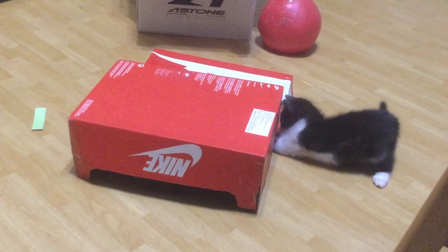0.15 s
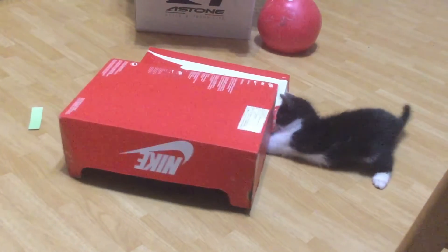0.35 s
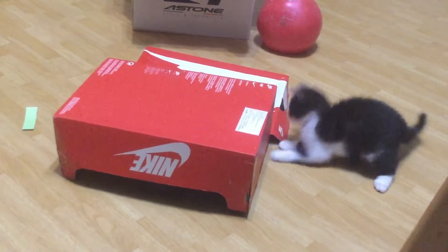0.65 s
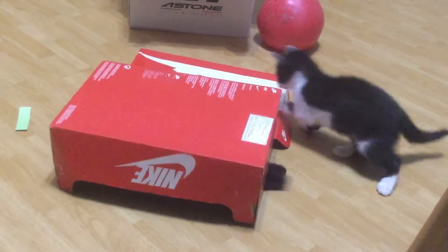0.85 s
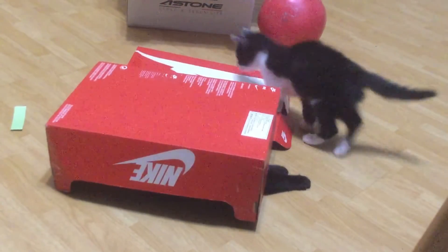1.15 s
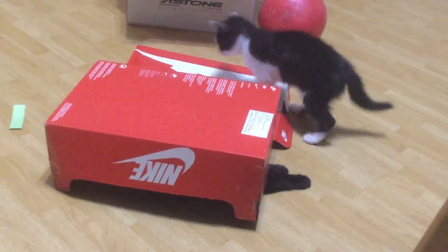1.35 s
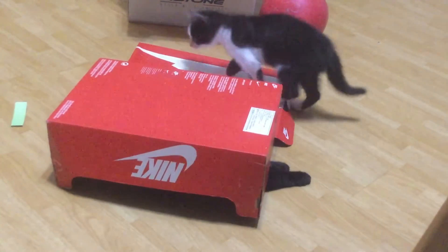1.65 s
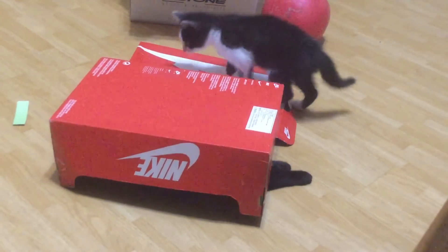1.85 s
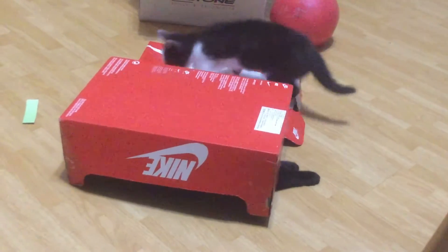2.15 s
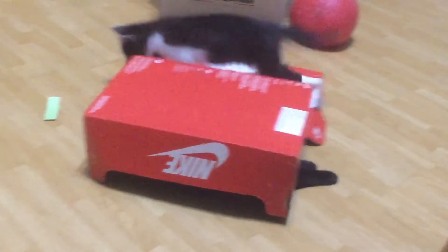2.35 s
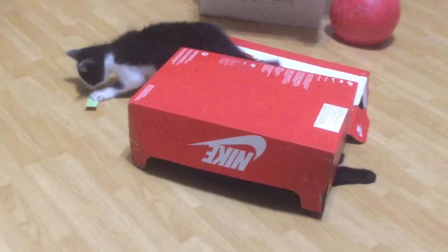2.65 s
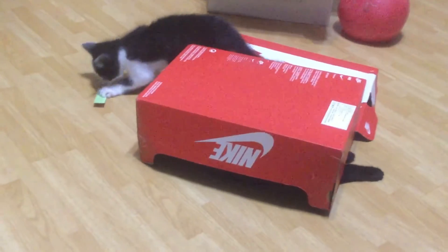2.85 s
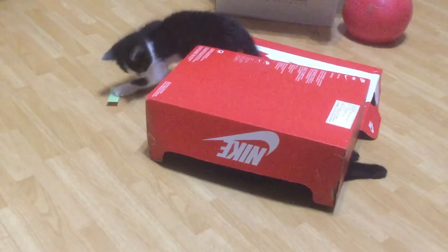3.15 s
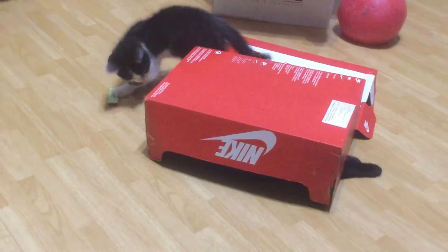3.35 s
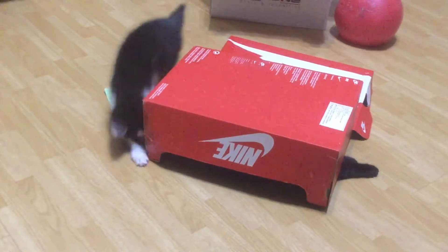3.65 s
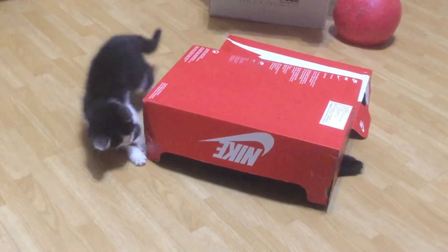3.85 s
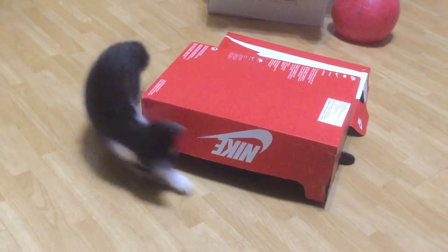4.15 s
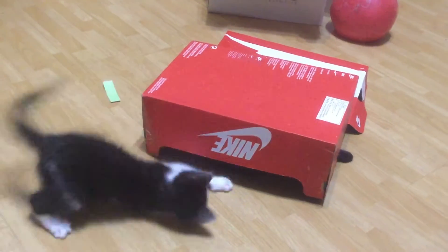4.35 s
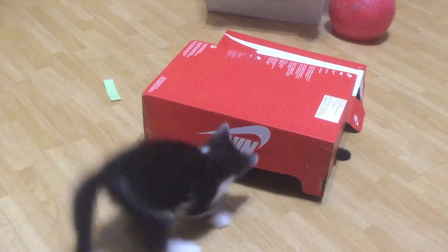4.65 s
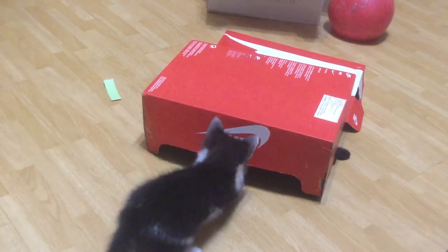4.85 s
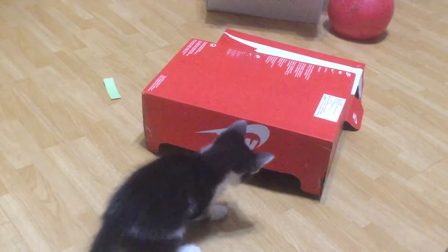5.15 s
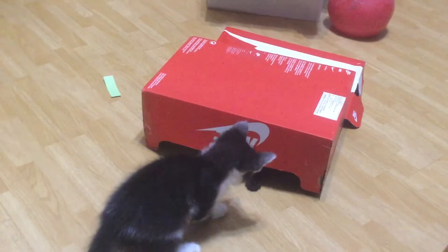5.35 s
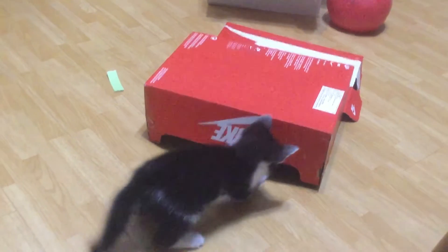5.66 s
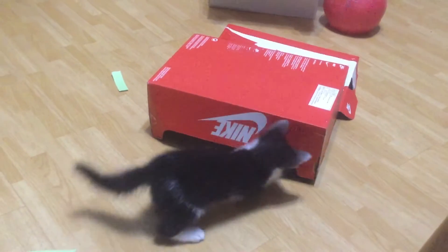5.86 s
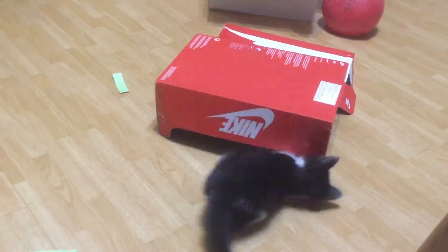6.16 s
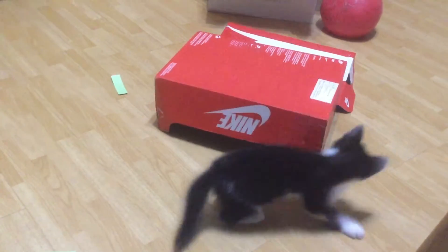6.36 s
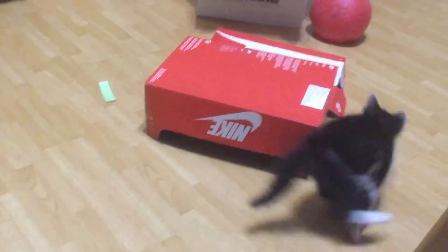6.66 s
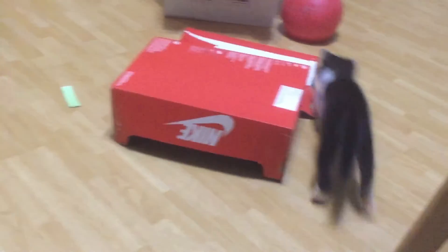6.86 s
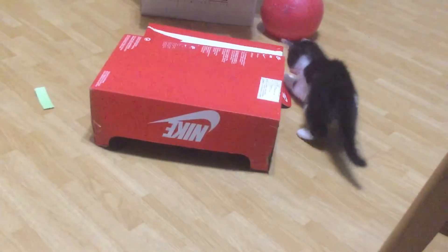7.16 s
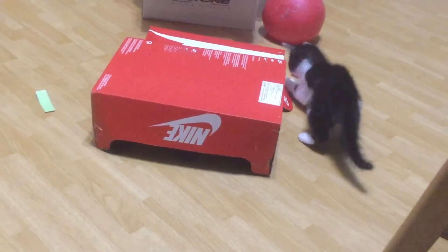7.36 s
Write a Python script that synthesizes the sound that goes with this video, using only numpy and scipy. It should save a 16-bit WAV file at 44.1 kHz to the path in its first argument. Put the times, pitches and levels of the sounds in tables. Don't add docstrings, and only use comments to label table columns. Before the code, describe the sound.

A kitten plays with an empty cardboard box on a laminate floor in a quiet furnished room. A soft hollow rap and light scraping open, then paw thumps and a faint flap creak. The box tumbles with a heavy boxy slam, followed by sparse ticks, one round thump and a lone knock. A flurry of paws and a sharp claw scrape finish, heard by a nearby microphone over low rumble and faint hiss.

```python
import sys
import numpy as np
from scipy import signal
from scipy.fft import rfft, irfft, next_fast_len
from scipy.io import wavfile
from scipy.ndimage import uniform_filter1d, map_coordinates

SR = 44100
rng = np.random.default_rng(int(sys.argv[2]) if len(sys.argv) > 2 else 0)


def log_audio(samples):
    frames = np.atleast_2d(samples).T
    limited = np.clip(frames, -1, 1)
    pcm = np.round(limited * 32767).astype(np.int16)
    wavfile.write(sys.argv[1], SR, pcm)


def field_ratio(decibels):
    return 10 ** (np.asarray(decibels, dtype=float) / 20)


N = 330309

# t/s, level/dB
HOUSE_LEVEL = [(0, -66), (.7, -67), (1.502, -67), (2.3, -66.5), (3.2, -66.5), (4.1, -68.5), (4.6, -68),
               (5.5, -69.5), (6.0, -66.5), (6.7, -68.5), (7.49, -67)]
# f/Hz, density/dB
RUMBLE_SPECTRUM = [(12, -57.5), (20, -44), (54, 0.5), (151, -0.5), (232, -2), (321, -4.5), (356, -7.5),
                   (452, -12.5), (594, -13.5), (1060, -19), (1200, -29), (1560, -61), (2640, -120)]
HISS_SPECTRUM = [(710, -41), (1200, -0.5), (1510, -1.5), (1700, -2), (1830, -2.5), (2720, -3.5),
                 (3530, -3.5), (4530, -4), (5330, -4.5), (5880, -7), (6930, -7), (7640, -9), (8610, -6),
                 (12900, -10.5), (16200, -14.5)]

# f/Hz, level/dB, t60/s
HOLLOW_MODES = [(87.5, -2, 0.62), (144.4, 1, 0.2), (182, -2, 0.14), (250.7, -4.5, 0.58), (307.6, 0, 0.35),
                (412, -6.5, 0.41)]
PANEL_MODES = [(455.6, 9, 0.22), (586, -5.5, 0.53), (624.6, 11, 0.18), (725, 1.5, 0.41), (764.4, 5.5, 0.21),
               (892, -8.5, 0.74), (950, -5.5, 0.36), (1037, -12.5, 0.81), (1070, -10, 0.33),
               (1200, -9, 0.38), (1476, -10, 0.27), (1620, -11, .25), (2100, -17, .25)]
# f/Hz, density/dB
CRACK_SPECTRUM = [(710, -37.5), (1200, -12), (1850, -2.5), (3010, -10.5), (4310, -6.5), (7490, -20),
                  (14400, -36.5), (16000, -37.5)]

# t/s, thump peak level/dB, thump f/Hz, panel over thump level/dB, panel f/Hz
RAPS = [(0.001, -41.5, 370, -1.5, 720), (0.909, -49.5, 200, 7.5, 625), (1.604, -50, 230, -0.5, 774),
        (1.603, -62, 300, 12, 1140), (2.267, -48.5, 399.4, 2.5, 796), (2.268, -51.5, 150, 10.5, 1210),
        (2.268, -58.5, 310, 13, 1620), (3.815, -29, 185, -4.5, 697), (3.814, -59, 298, 7, 1150),
        (5.05, -49, 412, -1, 785), (6.131, -38, 167, 0.5, 1050), (6.169, -39, 169.6, 2.5, 1013),
        (7.114, -43.5, 197, 8, 490)]
# t/s, peak level/dB, thump f/Hz
THUMPS = [(0.776, -50, 160), (0.846, -33, 126), (1.391, -48.5, 151), (1.651, -56, 240), (1.865, -49.5, 150),
          (2.523, -41.5, 310), (2.51, -41, 151), (2.679, -34, 260), (2.668, -26, 125), (2.972, -59, 240),
          (3.045, -50.5, 127), (3.087, -53, 155.5), (3.604, -52, 179), (5.052, -42, 148), (6.068, -41, 139),
          (6.07, -46, 390), (6.21, -43.5, 187), (6.306, -38.5, 154), (6.399, -43.5, 387), (6.438, -42, 164),
          (7.115, -28, 294), (7.114, -34.5, 154.5), (7.171, -45, 252)]
# t/s, thump peak level/dB, thump f/Hz, panel over thump level/dB, panel f/Hz
SLAMS = [
    (0.798, -46, 103, -5, 676),
    (2.422, -37.5, 177, -8, 730),
    (2.463, -42.5, 149, -13, 726),
    (2.4838, -38, 298, 6, 903),
    (2.644, -34, 307, 0, 1141),
    (2.65, -29, 227, 2, 890),
    (2.6644, -16.5, 185.6, -2, 960),
    (2.717, -33.5, 270, 4.5, 900),
    (6.095, -40.5, 136, -7, 800),
    (6.117, -32, 185, -0.5, 966),
]
# t/s, thump peak level/dB, thump f/Hz, crack over thump level/dB
CLAW_STRIKES = [
    (0.36, -54, 192, -7),
    (7.018, -53, 180, -3),
    (7.047, -44, 185, -19),
    (7.099, -37, 357, 8.5),
    (7.149, -43.5, 291, -3),
    (7.17, -42, 184, 2),
]
# t/s, level/dB, f/Hz, t60/s
FREE_RINGS = [(2.268, -46, 759, .2), (2.268, -47, 845, .12), (2.672, -34, 250, 0.46),
              (5.051, -47.5, 410, 0.22), (7.114, -35, 420, 0.08), (6.303, -34, 165.7, 0.27),
              (6.485, -55, 190, 0.1), (6.49, -56, 670, 0.2), (2.269, -56, 1790, 0.079),
              (2.7, -43, 194, 0.2), (2.678, -38, 790, 0.11), (2.668, -39, 1023, 0.2),
              (2.68, -46.5, 1464, 0.18), (3.825, -44, 188, 0.32), (3.835, -46, 150, 0.33),
              (3.82, -49, 307, 0.2), (3.819, -44, 655, 0.11), (2.55, -50, 770, 0.12),
              (6.072, -48, 425, 0.25), (.001, -49, 377, .22), (.001, -55, 291, .3), (0.00098, -54, 721, .3),
              (.001, -60, 1055, .25), (0.372, -58, 420, 0.5), (5.058, -51, 150, 0.22), (.912, -41, 418, .2),
              (1.003, -55, 415, .12), (.8, -58, 680, .4), (.865, -46, 300, .1), (6.398, -45, 430, .12),
              (6.431, -46, 405, .13), (7.19, -50, 240, .5), (2.52, -41, 310, .12), (2.78, -47, 130, .25),
              (2.735, -41, 750, .14), (2.672, -38, 650, .11), (5.06, -60, 720, .15), (6.25, -52, 715, .15),
              (7.14, -52, 1220, .12), (1.165, -70, 1720, .25), (1.185, -73, 2930, .1)]

# peak t/s, peak level/dB, rise/s, fall/s
SHOVES = [(0.004, -50, .01, 0.07), (0.44, -58, 0.2, 0.22), (0.916, -43.5, 0.13, 0.11),
          (1.07, -58.5, 0.27, .14), (1.46, -59, 0.29, 0.51), (1.606, -51.5, .02, 0.13),
          (1.85, -60, 0.2, 0.15), (2.3, -54, 0.02, .5), (2.52, -38, .1, 0.093), (3.0, -62, .3, 0.37),
          (3.23, -67, 0.66, .05), (3.6, -62, .12, 0.43), (4.52, -59.5, 0.15, 0.047),
          (6.11, -41, 0.029, 0.18), (6.326, -50.5, 0.22, 0.38), (6.47, -53, 0.23, 0.09),
          (7.05, -51, 0.046, .04), (7.125, -34.5, .012, 0.094), (7.2, -63, .05, 0.087)]
# peak t/s, peak level/dB, rise/s, fall/s
SCRAPES = [(0.004, -59, 0.011, 0.16), (0.392, -57, 0.073, 0.24), (0.82, -59, 0.082, 0.17),
           (0.862, -52, 0.086, 0.11), (0.916, -49, 0.023, 0.075), (1.2, -74, .2, 0.071),
           (1.606, -63.5, 0.039, 0.042), (1.87, -66.5, 0.16, 0.18), (2.29, -59, 0.03, 0.2),
           (2.51, -48.5, 0.085, 0.23), (2.99, -73.5, 0.062, .2), (3.582, -67.5, 0.15, 0.096),
           (4.44, -69.5, 0.016, 0.19), (5.99, -68, 0.28, 0.1), (6.122, -49, 0.051, 0.39),
           (6.31, -52, 0.14, 0.24), (6.49, -56.5, 0.24, 0.081), (6.95, -75, 0.37, 0.32),
           (7.045, -59.5, 0.034, 0.34), (7.1, -38, 0.0088, 0.037), (7.15, -46, 0.076, 0.085)]
# peak t/s, peak level/dB, rise/s, fall/s
RUBS = [(0.41, -69, 0.23, 0.22), (0.862, -60, 0.054, 0.12), (0.916, -64, .06, 0.054),
        (1.15, -73.5, 0.43, .4), (1.57, -71.5, .04, .03), (2.37, -65, 0.14, 0.22),
        (2.512, -53, 0.098, 0.19), (3.02, -74, 0.22, 0.28), (3.582, -60, 0.06, 0.04),
        (4.44, -66, .01, 0.11), (5.99, -72, 0.32, 0.068), (6.082, -61.5, 0.012, 0.12),
        (6.28, -63, 0.17, 0.23), (6.49, -64.5, 0.14, 0.066), (6.84, -70, 0.19, 0.55),
        (6.98, -65.5, 0.37, 0.11), (7.052, -58, 0.077, 0.21), (7.1, -43.5, 0.018, 0.12),
        (7.196, -55, .1, 0.063)]
# f/Hz, density/dB
SCRAPE_SPECTRUM = [(240, -31.5), (400, 4), (440, -12.5), (699, 0.5), (800, -8), (952, -4.5), (2770, -31),
                   (4000, -51), (5200, -68), (8800, -120)]
FUR_SPECTRUM = [(710, -31), (1200, -2), (1370, -5), (1890, -3.5), (2650, -8), (3430, -8), (3700, -7.5),
                (6230, -11), (7250, -16.5), (8350, -11.5), (11200, -25.5), (14200, -17), (16000, -40)]

# t/s, peak level/dB, f/Hz
TAPS = [(1.1, -48.5, 604), (1.446, -54, 665), (1.651, -50, 684), (2.951, -51, 686), (4.308, -54, 756),
        (4.559, -50.5, 654), (5.985, -53.5, 780), (6.431, -44, 890), (6.073, -53, 517), (6.088, -50, 790),
        (6.101, -36, 800), (6.141, -32.5, 560), (6.171, -38.5, 560), (6.214, -43, 571), (6.255, -46, 716),
        (6.275, -45, 700), (2.482, -30.5, 1090), (2.485, -22.5, 750), (2.4885, -24, 560), (2.535, -44, 850),
        (5.049, -56, 950), (3.8145, -40, 1100), (0.375, -57, 423), (0.48, -60, 1500), (0.848, -50, 420),
        (0.909, -36, 420), (6.4, -50, 450), (2.72, -33.5, 560), (2.783, -41.5, 600), (3.818, -37, 484),
        (7.1215, -34.5, 431), (6.116, -37, 950), (6.116, -48, 1700), (7.096, -39, 1700), (7.1, -43, 690),
        (0.931, -43, 450), (0.943, -46, 620), (0.963, -51, 700), (0.78, -55, 310), (7.176, -42, 480),
        (7.196, -50, 1250), (6.134, -42, 1000), (6.23, -50, 1050), (6.31, -48, 700), (2.682, -32, 800),
        (2.742, -40, 700), (3.866, -52, 800), (3.888, -54, 700)]
# width/Hz, t60/s, broad click level/dB
TAP_BODY = (570, 0.014, -15)
# t/s, peak level/dB, f/Hz, width/Hz, t60/s
BRUSHES = [(1.05, -72, 9000, 6000, 0.25), (1.545, -68, 5800, 7000, 0.2), (3.80, -65.5, 7350, 5480, 0.17),
           (4.44, -73, 1500, 3100, 0.12), (4.78, -67, 8500, 6080, .11), (4.80, -60.5, 6040, 1300, .067),
           (4.87, -72, 11000, 6030, 0.13), (5.358, -65, 9400, 2960, 0.082), (5.65, -69, 5000, 8100, 0.13),
           (6.76, -75, 9100, 4700, 0.81), (6.92, -71.5, 11800, 4600, 0.5), (7.02, -57.5, 1940, 700, 0.33),
           (7.018, -56, 746, 200, 0.32), (2.495, -65, 13040, 4020, .4), (2.665, -64.5, 12500, 5000, 0.15),
           (2.67, -45, 1600, 800, 0.34), (4.452, -64, 7000, 6050, 0.17), (4.44, -67, 3500, 2500, .15),
           (0.845, -61.5, 1800, 900, 0.23), (6.11, -54.5, 1600, 790, 0.28), (6.27, -62, 1800, 1300, 0.38),
           (7.105, -48.5, 3300, 2200, .42), (7.105, -64, 13000, 4000, .3), (7.27, -66, 2500, 1300, 0.18),
           (6.44, -63, 2200, 600, .25), (6.325, -62, 1880, 300, .15), (6.47, -66, 1500, 600, .2),
           (7.2, -60, 1900, 350, .25), (6.18, -60, 1900, 1200, .35), (6.08, -62, 4000, 1500, .15),
           (2.6, -66, 15000, 2000, .1)]
# t/s, slip rate f/Hz, level/dB
CREAK_GLIDE = [
    (1.16, 751, -85),
    (1.175, 736, -65.5),
    (1.209, 739, -69.5),
    (1.24, 725, -83),
]
# multiple, level/dB
CREAK_ORDERS = [(1, -1), (2, 4), (3, -22), (4, -14), (5, -32), (6, -24)]
# t/s, peak level/dB, f/Hz
SQUEAKS = [(1.311, -60, 1680), (1.7694, -68, 5700), (1.897, -59.5, 1500), (2.2223, -65, 1720),
           (2.98, -62, 1210), (3.0111, -60, 1350), (3.0465, -64.5, 1708), (3.843, -61, 4630),
           (4.44, -54, 4800), (4.443, -61, 2480), (4.806, -59.5, 6050), (5.825, -62, 1430),
           (5.8264, -61, 3440), (5.9838, -67, 3000), (6.427, -59, 3800)]
# width/Hz, t60/s, broad click level/dB
SQUEAK_BODY = (430, 0.034, -13.5)
# t/s, peak level/dB, f/Hz
TICKS = [(2.369, -47, 11800), (2.605, -42, 9500), (2.6148, -51, 8200), (3.1093, -54, 7010),
         (3.5089, -62, 7080), (3.5837, -42, 8950), (3.5856, -38.5, 7170), (3.5955, -57, 10600),
         (4.4413, -63, 8000), (4.443, -39, 8550), (4.4432, -50, 12500), (4.4476, -54, 9000)]
# width/Hz, t60/s, broad click level/dB
TICK_BODY = (6800, 0.0052, -17)
# f/Hz, t60/s
ROOM_DECAY = [(150, 0.37), (1000, 0.33), (4000, 0.31), (12000, 0.32)]


def unit(x):
    return x / np.sqrt(np.mean(x ** 2) + 1e-20)


def along(points, hz):
    f, v = np.transpose(points)
    return np.interp(np.log(hz + 1), np.log(f + 1), v)


def wobble(rate, size=N):
    return map_coordinates(rng.standard_normal(int(size * rate / SR) + 4), [np.arange(size) * rate / SR])


def filtered(x, response):
    m = next_fast_len(len(x) + SR // 2)
    return irfft(rfft(x, m) * response(np.fft.rfftfreq(m, 1 / SR)), m)[:len(x)]


def coloured(x, spectrum):
    return unit(filtered(x, lambda hz: field_ratio(along(spectrum, hz))))


def band(x, hz, width_hz):
    return unit(signal.lfilter(*signal.iirpeak(hz, hz / width_hz, SR), x))


def add(track, s, sound):
    part = track[max(round(s * SR), 0):][:len(sound)]
    part += sound[:len(part)]


def air():
    level_db = np.interp(np.arange(N) / SR, *np.transpose(HOUSE_LEVEL)) + 1.9 * wobble(11)
    rumble = field_ratio(level_db) * coloured(rng.standard_normal(N), RUMBLE_SPECTRUM)
    hiss = field_ratio(-77) * coloured(rng.standard_normal(N), HISS_SPECTRUM)
    return rumble + hiss


def blows():
    thumps = [(*row, -17.5, 786, -27) for row in THUMPS]
    raps = [(*row, -34) for row in RAPS]
    slams = [(*row, -14) for row in SLAMS]
    claws = [(s, db, hz, -8, 730, crack_db) for s, db, hz, crack_db in CLAW_STRIKES]
    return thumps + raps + slams + claws


def ring(modes, struck_hz, spread, chance, damp, slap, brief, dull, size):
    hz, db, t60 = np.transpose(modes)[:, :, None]
    hz = hz * (1 + 0.025 * chance[::-1, None])

    def since_arrival(f):
        delay = np.maximum(0.098 * (f ** -.5 - .03), 0)
        return np.maximum(np.arange(size) / SR - delay, 0)

    t = since_arrival(hz)
    off_pitch_db = np.minimum(6 * (np.log2(hz / struck_hz) / spread) ** 2, 18)
    level_db = db + 0.75 * chance[:, None] - off_pitch_db
    decay = field_ratio(level_db - 60 * t / (damp * t60))
    onset = 1 - np.exp(-1.5 * t * hz)
    tones = np.sum(decay * np.sin(2 * np.pi * hz * t) * onset, axis=0)

    t = since_arrival(struck_hz)
    turns = struck_hz * t
    blow = slap * turns * np.exp(-brief * turns) * np.sin(2 * np.pi * turns)
    thud = band(band(rng.standard_normal(len(t)), struck_hz, 0.79 * struck_hz), struck_hz, 1.4 * struck_hz)
    thud = dull * thud * field_ratio(-60 * t / (0.32 * damp)) * (1 - np.exp(-turns))
    x = tones + blow + thud
    return x / np.max(np.abs(x))


def knocks():
    hollow, panel, cracks = np.zeros((3, N))
    t = np.arange(SR // 8) / SR
    crack = (1 - np.exp(-t / 0.0014)) * (field_ratio(-60 * t / 0.021) + field_ratio(-7.5 - 60 * t / 0.074))
    split = len(HOLLOW_MODES)
    for s, db, low_hz, panel_db, panel_hz, crack_db in blows():
        chance = rng.standard_normal(split + len(PANEL_MODES))
        boom = ring(HOLLOW_MODES, low_hz, 0.87, chance[:split],
                    damp=0.43, slap=4.36, brief=1.26, dull=0.79, size=SR // 5)
        knock = ring(PANEL_MODES, panel_hz, 1.0, chance[split:],
                     damp=0.3, slap=10.9, brief=0.77, dull=1.0, size=SR // 8)
        add(hollow, s, field_ratio(db) * boom)
        add(panel, s, field_ratio(db + panel_db) * knock)
        add(cracks, s, field_ratio(db + crack_db - 6.5) * crack)
    panel = filtered(panel, lambda f: 1 / (1 + 1j * f / 2600) ** 3)
    return hollow, panel + cracks * coloured(rng.standard_normal(N), CRACK_SPECTRUM)


def rings():
    out, t = np.zeros(N), np.arange(SR // 3) / SR
    for s, db, hz, t60 in FREE_RINGS:
        turns = hz * t + 0.13 * wobble(40, size=len(t))
        flutter_db = 2.5 * np.minimum(hz / 500, 1) * wobble(60, size=len(t))
        level = field_ratio(db + flutter_db - 60 * t / t60)
        add(out, s, level * (1 - np.exp(-.5 * hz * t)) * np.sin(2 * np.pi * turns))
    return out


def strokes(table):
    s, db, rise, fall = np.transpose(table)[:, :, None]
    t = np.arange(0, N / SR, .001)
    away = np.maximum((s - t) / np.maximum(rise, .004), (t - s) / np.maximum(fall, .004))
    gain = np.linalg.norm(field_ratio(db - 20 * away), axis=0)
    return np.interp(np.arange(N) / SR, t, gain)


def grit(rate, scatter_db, smooth):
    sizes = rng.standard_normal(N) * field_ratio(scatter_db * rng.standard_normal(N))
    slips = (rng.random(N) < rate / SR) * sizes
    return unit(slips) + smooth * rng.standard_normal(N)


def resonant(x, modes, widen):
    def body(f):
        total = 0
        for k, (hz, db, t60) in enumerate(modes):
            width = widen * np.log(1000) / (np.pi * t60)
            total = total + (-1) ** k * field_ratio(db) * 1j * f * width / (hz * hz - f * f + 1j * f * width)
        return total
    return unit(filtered(x, body))


def flecked(x, depth_db):
    z = signal.stft(x, nperseg=256)[2]
    field = uniform_filter1d(rng.standard_normal(z.shape), size=3, axis=0)
    field = uniform_filter1d(field, size=6, axis=1)
    return unit(signal.istft(z * field_ratio(depth_db * unit(field)), nperseg=256)[1][:N])


def drags():
    levels = field_ratio(-2.5) * np.array([strokes(SHOVES), strokes(SCRAPES), strokes(RUBS)])
    shove = resonant(grit(150, scatter_db=2.5, smooth=0.95), HOLLOW_MODES, widen=1.5)
    shove = unit(shove + 0.99 * band(shove, 154.0, 42.0))
    slips = grit(700, scatter_db=1.0, smooth=0.8)
    scrape = .5 * resonant(slips, PANEL_MODES, widen=14.0)
    scrape = scrape + coloured(slips, SCRAPE_SPECTRUM) + 0.12 * band(slips, 1800, 880)
    scrape = flecked(scrape, depth_db=4.0)
    fur = flecked(coloured(grit(1500, scatter_db=3.5, smooth=1.2), FUR_SPECTRUM), depth_db=3)
    return np.sum(levels * [shove, scrape, fur], axis=0)


def puffs(table, kind, rise, clear=0, size=SR // 8):
    out, t = np.zeros(N), np.arange(size) / SR
    for s, db, hz, width_hz, t60, broad_db in (row + kind for row in table):
        noise = rng.standard_normal(len(t))
        burst = band(band(noise, hz, width_hz), hz, 1.5 * width_hz)
        burst = burst + field_ratio(broad_db) * band(noise, 2495, 5100)
        tone = 1.47 * np.sin(2 * np.pi * hz * t)
        sound = (1 - clear) * burst + clear * tone
        add(out, s, field_ratio(db + 1.5 - 60 * t / max(t60, .003)) * (1 - np.exp(-t / rise)) * sound)
    return out


def creak():
    s, hz, db = np.transpose(CREAK_GLIDE)
    t, out = np.arange(s[0], s[-1], 1 / SR), np.zeros(N)
    slip_hz = np.interp(t, s, hz) * (1 + 0.029 * wobble(247, size=len(t)))
    turns = np.cumsum(slip_hz) / SR
    rasp = np.zeros(len(t))
    for k, level_db in CREAK_ORDERS:
        rasp += field_ratio(level_db + 6.0 * wobble(130, size=len(t))) * np.sin(2 * np.pi * k * turns)
    rub = band(rng.standard_normal(len(t)), 1530, 800)
    add(out, s[0], field_ratio(np.interp(t, s, db)) * (rasp + 0.97 * rub))
    return out


def room(x):
    wet, step = np.zeros(N), SR // 3
    for start in range(0, N, step):
        hz, t, z = signal.stft(rng.standard_normal(SR // 2), SR, nperseg=256)
        decay = field_ratio(-60 * t / along(ROOM_DECAY, hz)[:, None])
        tail = signal.istft(z * decay, SR, nperseg=256)[1]
        echo = signal.fftconvolve(x[start:start + step], tail / np.linalg.norm(tail))
        add(wet, start / SR + .006, echo)
    return wet


def scene():
    def small_box(f):
        return (1j * f / (60 + 1j * f)) ** 2

    hollow, panel = knocks()
    hollow = filtered(hollow, small_box)
    free = rings()
    rubbing = filtered(drags(), small_box)
    taps = puffs(TAPS, TAP_BODY, clear=0.55, rise=0.00074)
    brushes = puffs(BRUSHES, (-16,), rise=0.012, size=SR // 3)
    flap = creak()
    squeaks = puffs(SQUEAKS, SQUEAK_BODY, clear=0.44, rise=0.0016)
    ticks = puffs(TICKS, TICK_BODY, clear=0.15, rise=0.000193) + brushes
    sharp = panel + squeaks + taps
    send = field_ratio(-7.5) * hollow + field_ratio(-5.5) * sharp + field_ratio(-8.0) * rubbing
    send = send + field_ratio(-6) * ticks + field_ratio(-7.0) * flap + field_ratio(-8.5) * free
    return (hollow + sharp + rubbing + ticks + flap + free + room(send) + air())[None]


def roll_off(x):
    return signal.sosfilt(signal.butter(12, 16440, fs=SR, output="sos"), x)


def record(dry):
    mix = filtered(dry[0], lambda f: np.where(f < 15800, 1, .08))[None]
    return roll_off(mix)


dry = scene()
out = record(dry)
log_audio(out)
```